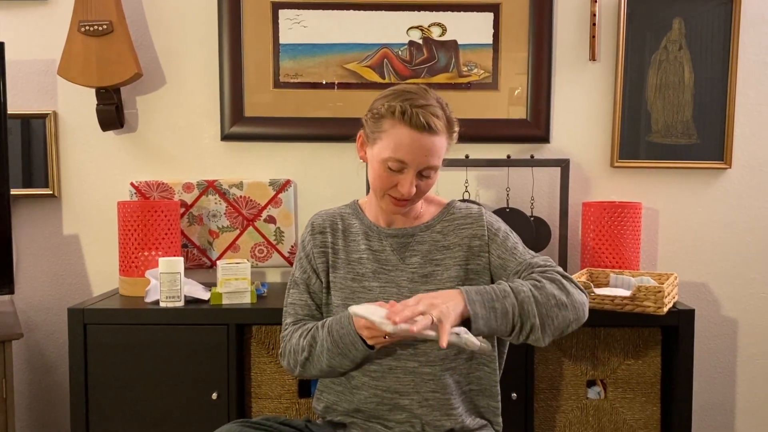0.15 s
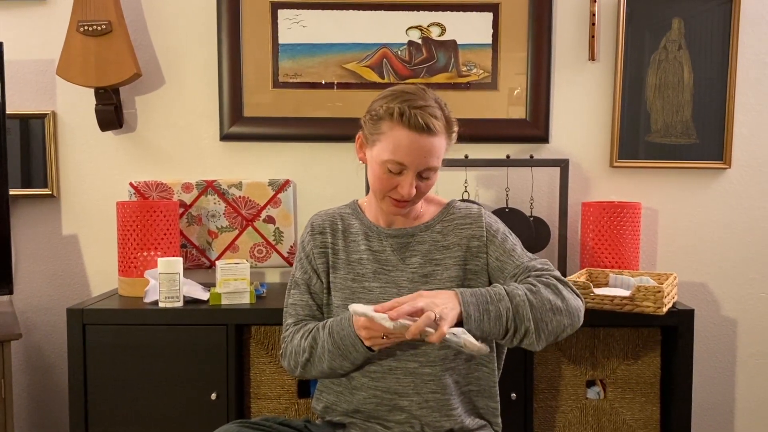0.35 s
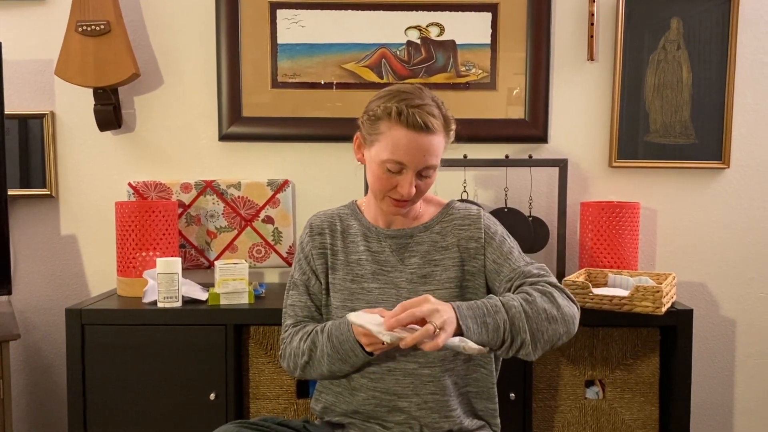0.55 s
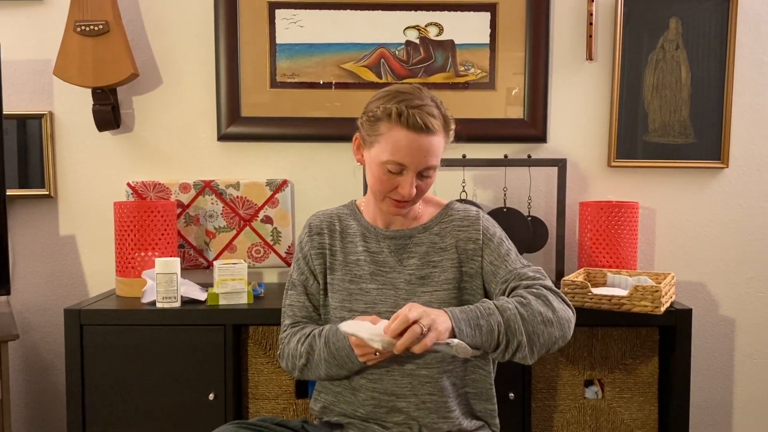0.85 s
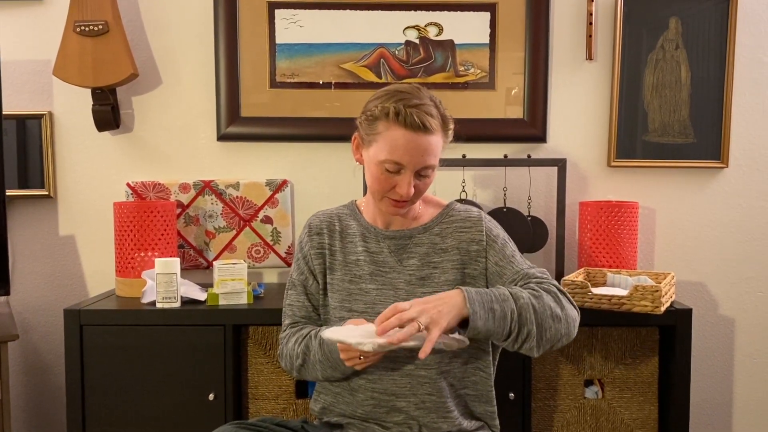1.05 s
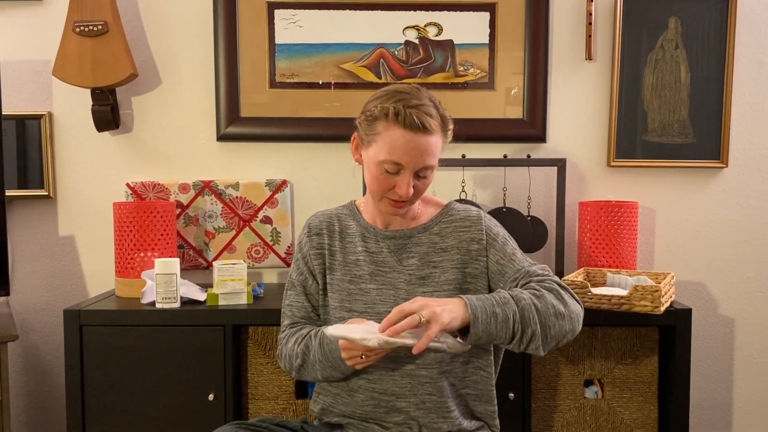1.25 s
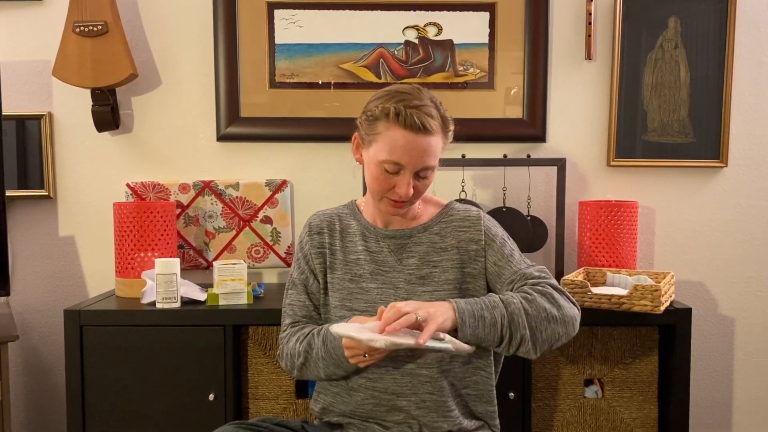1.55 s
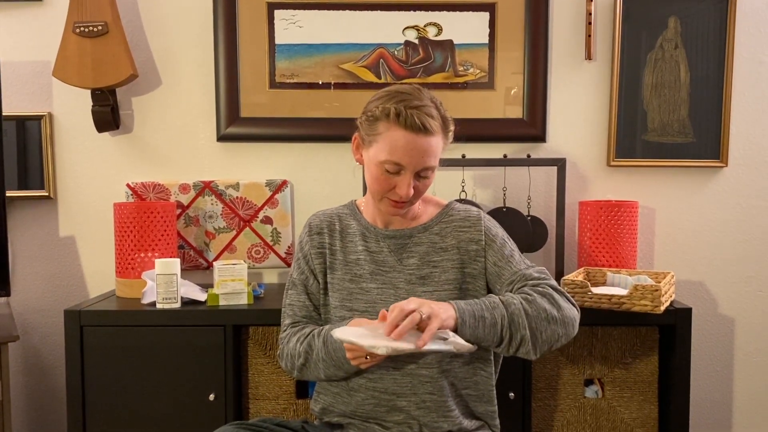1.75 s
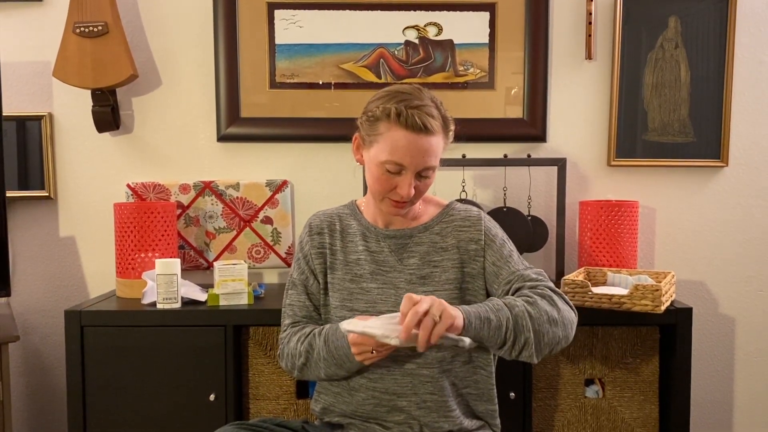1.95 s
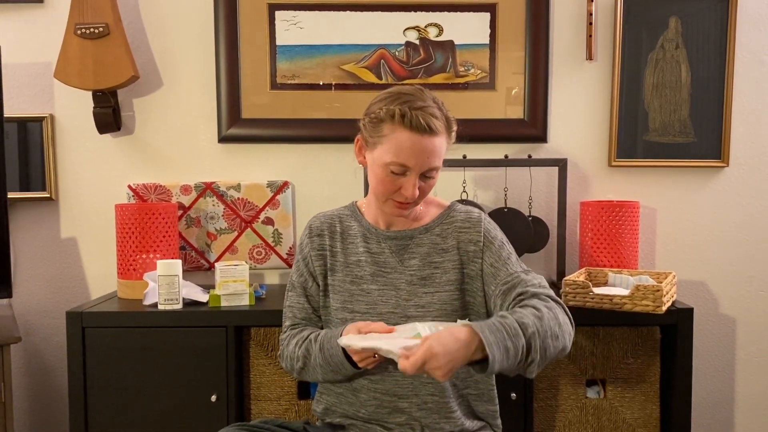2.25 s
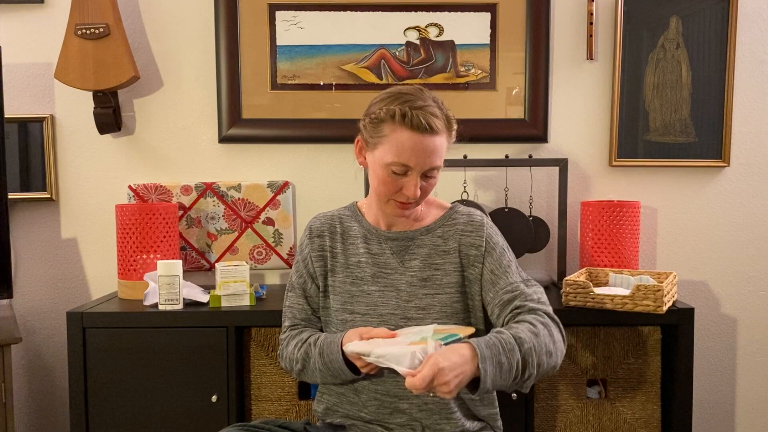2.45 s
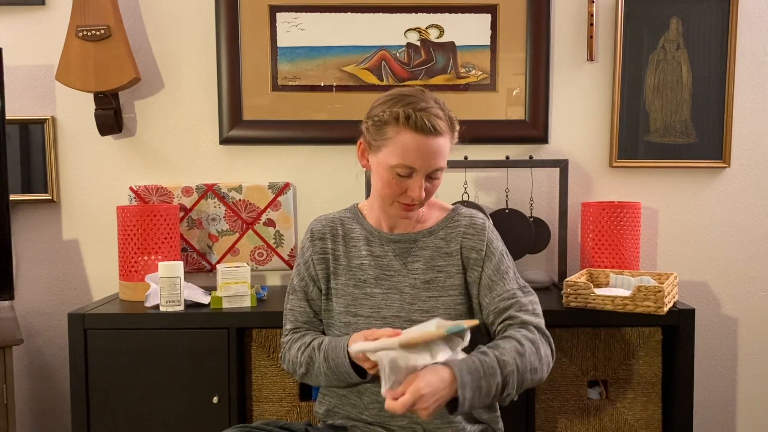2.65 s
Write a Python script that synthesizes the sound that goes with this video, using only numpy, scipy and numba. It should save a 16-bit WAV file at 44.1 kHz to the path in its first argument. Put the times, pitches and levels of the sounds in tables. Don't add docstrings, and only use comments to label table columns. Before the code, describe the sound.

Soft, bright paper rustling with tiny ticks comes first, then a sharp fold crack and a cluster of snaps, a brief easing, and fuller crackling at the end, in a slightly echoing room with faint hiss and low rumble.

```python
import sys
import numpy as np
from scipy import signal
from scipy.fft import rfft, irfft, next_fast_len
from scipy.io import wavfile
from scipy.ndimage import uniform_filter1d
from numba import njit

SR = 44100
rng = np.random.default_rng(int(sys.argv[2]) if len(sys.argv) > 2 else 0)


def linear_from_db(decibels):
    return 10 ** (np.asarray(decibels, float) / 20)


def log_audio(samples):
    frames = np.atleast_2d(samples).T
    limited = np.clip(frames, -1, 1)
    pcm = np.round(limited * 32767).astype(np.int16)
    wavfile.write(sys.argv[1], SR, pcm)


N = 123479


def unit(x):
    return x / np.sqrt(np.mean(x ** 2))


def colour(x, spectrum):
    f, db = np.array(spectrum, float).T
    size = next_fast_len(N)
    hz = np.maximum(np.arange(size // 2 + 1) * SR / size, 1)
    gain = linear_from_db(np.interp(np.log(hz), np.log(f), db))
    return unit(irfft(rfft(x, size) * gain, size)[:N])


def air():
    # f/Hz, density/dB per Hz
    air_spectrum = [(3, 0), (17, -2), (29, -19), (50, -26), (130, -37), (400, -45), (2000, -50),
                    (15000, -60)]
    return linear_from_db(-41) * colour(rng.standard_normal(N), air_spectrum)


def hand():
    # peak t/s, level/dB, rise/s per 10 dB, fall/s per 10 dB, grip on the large folds/dB
    strokes = [(.019, -53.5, .047, .07, 6), (.122, -38, .045, .025, -2), (.197, -44, .047, .07, 1),
               (.327, -42.9, .112, .097, -3), (.402, -42.5, .094, .07, -5), (.537, -41.4, .098, .056, 0),
               (.668, -44.2, .039, .125, 0), (.84, -43.2, .22, .22, 1), (1.098, -45.6, .063, .043, 3),
               (1.275, -39.3, .085, .065, -2), (1.361, -43.2, .039, .084, 1), (1.521, -54.9, .042, .111, 6),
               (1.655, -44.1, .038, .039, 2), (1.732, -42.5, .029, .052, -3), (1.797, -36.4, .053, .06, 1),
               (1.842, -34.6, .012, .17, 4), (1.953, -35.2, .11, .23, 4), (2.209, -38, .11, .07, 4),
               (2.333, -41.2, .051, .058, 6), (2.45, -31.2, .103, .065, 5), (2.57, -37.1, .085, .081, 9),
               (2.656, -30.4, .061, .052, 1), (2.703, -30.8, .051, .055, 10), (2.799, -26.6, .021, .05, 6)]
    rounding = 1.5
    t = np.arange(N) / SR
    fine, firm = 0, 0
    for at, db, rise, fall, grip_db in strokes:
        away = np.where(t < at, (at - t) / rise, (t - at) / fall)
        power = linear_from_db(2 * (db - 10 * away ** rounding))
        fine = fine + power
        firm = firm + power * linear_from_db(2 * grip_db)
    return np.sqrt(fine), np.sqrt(firm)


def flutter(rate_hz):
    flutter_db = .9
    hold = int(SR / rate_hz)
    steps = np.repeat(rng.standard_normal(N // hold + 1), hold)
    slewed = uniform_filter1d(uniform_filter1d(steps, hold), hold)
    return linear_from_db(flutter_db * unit(slewed[:N]))


@njit
def rings(out, at, step, fade, size):
    for k in range(len(at)):
        z = size[k] + 0j
        turn = fade[k] * np.exp(1j * step[k])
        i, left = at[k], 1.
        while left > .003 and i < len(out):
            out[i] += z.imag
            z, left, i = z * turn, left * fade[k], i + 1
    return out


def buckles(spectrum, cycles, spread_db, count, size):
    low_hz, high_hz = spectrum[0][0], spectrum[-1][0]
    at = np.repeat(rng.integers(0, N, count), size)
    event_db = np.repeat(spread_db * np.minimum(rng.exponential(1., count), 5), size)
    pitch, own, way = rng.random((3, count * size))
    hz = low_hz + (high_hz - low_hz) * pitch
    gain = linear_from_db(event_db + 10 * np.log10(hz) + 6.0 * own) * np.sign(way - .5)
    fade = np.exp(-hz / SR / cycles * np.pi)
    return colour(rings(np.zeros(N), at, 2 * np.pi * hz / SR, fade, gain), spectrum)


def snaps(creases, t60_s, tail_db, cycles):
    late_s, trim_db = .0007, -2.5
    length = 2048
    out, t = np.zeros(N + SR), np.arange(length) / SR
    fade = np.exp(-np.log(1000) * t / t60_s)
    for at, db, hz in creases:
        band = [.5 * hz, min(2.4 * hz, 14000)]
        burst = signal.lfilter(*signal.butter(1, band, "band", fs=SR), rng.standard_normal(length))
        tick = np.sin(2 * np.pi * hz * t) * np.exp(-hz * t / cycles)
        i = int((at + late_s) * SR)
        out[i:i + length] += linear_from_db(db + trim_db) * (tick + linear_from_db(tail_db) * fade * unit(burst))
    return out[:N]


def tissue():
    # f/Hz, density/dB per Hz
    facet_spectrum = [(300, -33), (700, -17), (1400, -9), (2500, -5), (4800, -2), (6500, -2.6), (10000, -1),
                      (13000, -9)]
    fold_spectrum = [(90, -24), (180, -7), (280, -3), (400, -1), (700, 0), (1200, -1), (2000, -3),
                     (4000, -12)]
    # t/s, peak level/dB, ring f/Hz
    lone_creases = [(0.0782, -32, 7240), (0.1875, -29, 8470), (0.2714, -33, 8630), (0.5224, -24, 5960),
                    (0.614, -35, 7450), (0.7314, -29, 7900), (1.1862, -35, 4610), (1.3528, -26, 3880),
                    (1.4394, -36, 5850), (1.5194, -40, 4580), (1.5753, -40, 3030), (1.6247, -35, 7540),
                    (1.6561, -32, 1770), (1.726, -28, 5390), (1.7838, -24, 3900), (1.8594, -20, 4230),
                    (1.9144, -20, 3690), (1.9214, -19, 5450), (1.9394, -18, 4400), (1.9564, -20, 3950),
                    (1.9774, -19, 3920), (2.3276, -26, 5260), (2.4544, -21, 9550), (2.6434, -18, 4120),
                    (2.6824, -16, 1400), (2.6924, -14, 5890), (2.7064, -18, 6060), (2.7174, -19, 1220),
                    (2.7924, -17, 3130)]
    # t/s, peak level/dB, ring f/Hz
    stiff_fold = [
        (1.8272, -15, 4770),
    ]
    fine, firm = hand()
    facets = buckles(facet_spectrum, cycles=2.5, spread_db=2.2, count=24000, size=3) * flutter(40)
    folds = buckles(fold_spectrum, cycles=4.0, spread_db=2.0, count=2000, size=3) * flutter(25)
    snapping = snaps(lone_creases, t60_s=.02, tail_db=-12, cycles=1.4)
    crack = snaps(stiff_fold, t60_s=.035, tail_db=-7, cycles=3.0)
    return linear_from_db(-1.5) * fine * facets + linear_from_db(-15.6) * firm * folds + snapping + crack


def room(x, count=140):
    t60_s, gap_s, echo_db = .15, .003, -5
    t, hop = np.arange(SR // 6) / SR, N // count
    fade = np.exp(-np.log(1000) * t / t60_s) * (t > gap_s)
    tails = rng.standard_normal((count + 2, len(t))) * fade
    tails = signal.lfilter(*signal.butter(1, 12000, fs=SR), tails)
    window = np.sin(np.pi * np.arange(2 * hop) / hop / 2)
    x, out = np.pad(x, (hop, 2 * hop)), np.zeros(N + 5 * hop + len(t))
    for k in range(count + 1):
        part = signal.fftconvolve(x[k * hop:(k + 2) * hop] * window, tails[k])
        out[k * hop:k * hop + len(part)] += part
    return linear_from_db(echo_db) * out[hop:hop + N] / np.sqrt(np.sum(tails[0] ** 2))


def scene():
    paper = tissue()
    return (paper + room(paper) + air())[None]


def band_limit(x):
    return signal.sosfilt(signal.butter(12, 16480, fs=SR, output="sos"), x)


def record(dry):
    mic_hz, top_hz = 15000, 15660
    soft = signal.lfilter(*signal.butter(2, mic_hz, fs=SR), dry)
    steep = signal.ellip(12, .2, 76, top_hz, fs=SR, output="sos")
    return band_limit(signal.sosfilt(steep, soft))


dry = scene()
out = record(dry)
log_audio(out)
```